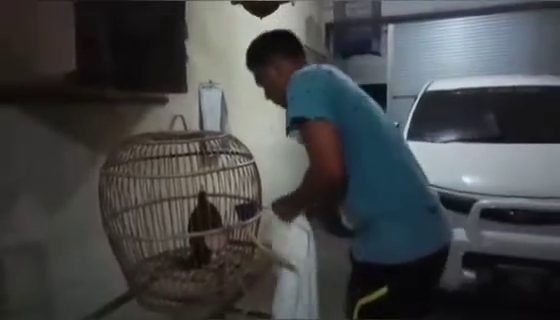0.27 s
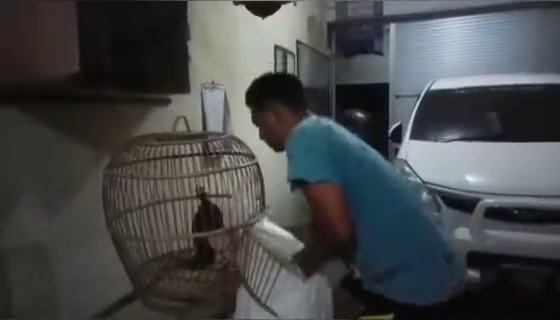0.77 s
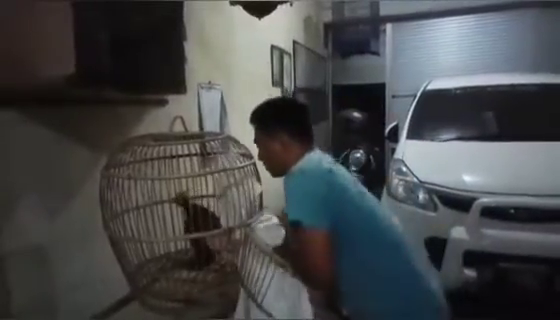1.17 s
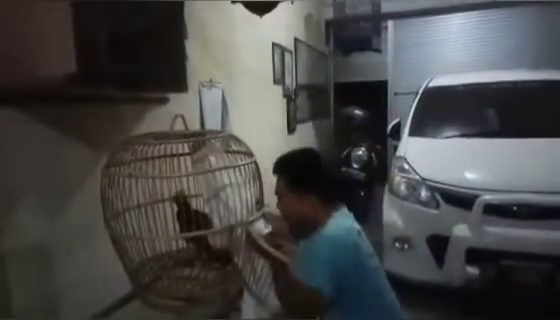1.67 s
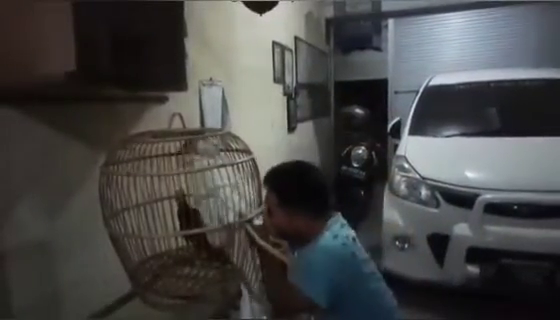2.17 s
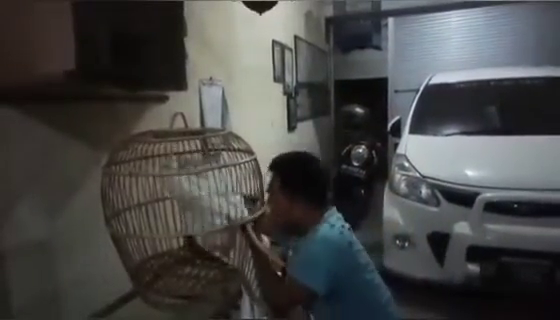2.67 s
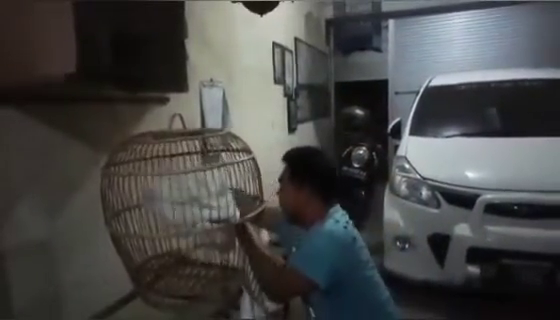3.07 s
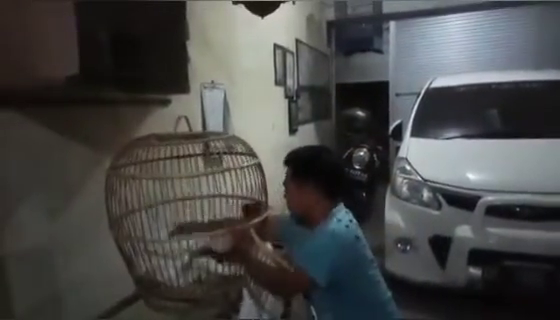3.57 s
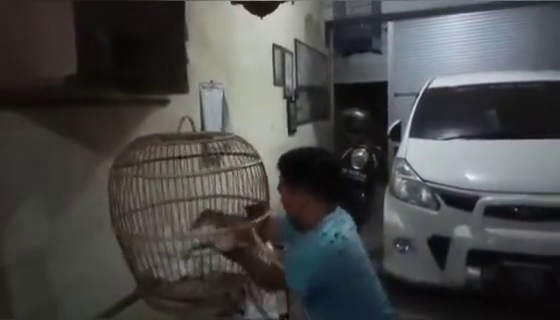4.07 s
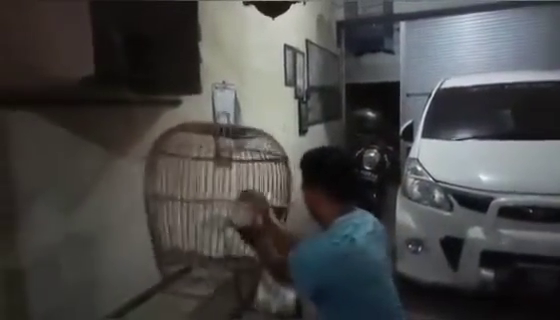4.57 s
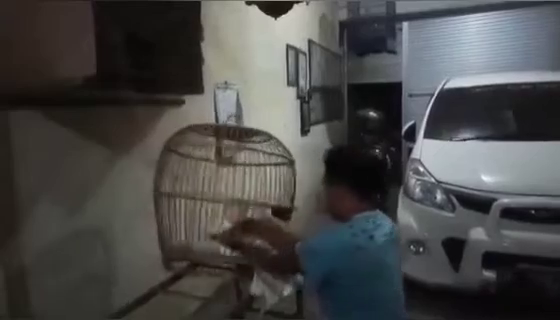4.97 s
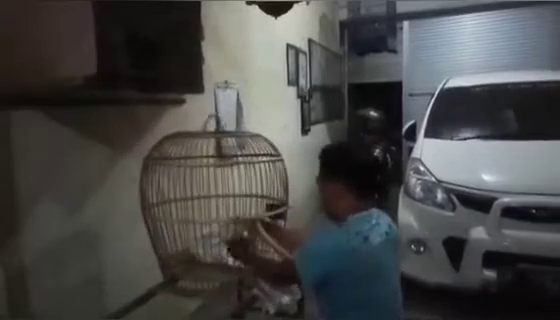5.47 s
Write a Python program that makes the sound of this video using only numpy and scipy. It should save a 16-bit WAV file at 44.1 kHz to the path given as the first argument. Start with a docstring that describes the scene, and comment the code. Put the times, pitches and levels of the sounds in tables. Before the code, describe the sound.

Faint air and low hum lie under isolated cage clicks for three seconds. Then bars and hoops swarm with tiny impacts as the base thumps and drags on a bench. After a lull and another rattle, heavier knocks and a brief fuzzy squeak follow, then one loud crack and fading ticks, with short sparse echoes.

```python
"""In a hard-walled garage at night, a bird is caught with a cloth inside a bamboo cage; the bird is silent.
Struck bars tick, loose bars and hoops chatter in swarms of tiny impacts, and cloth slips over them.
The base knocks and drags on its bench as blows ring its modes; noise whistles as squeaking joints.
Sparse echoes follow, and a dull microphone colours the cage and its echoes.
Faint air noise, a wavering hum and a hiss that swells with the sound lie underneath."""
import sys
import numpy as np
from scipy import signal
from scipy.io import wavfile
from scipy.ndimage import uniform_filter1d

SR = 44100
rng = np.random.default_rng(int(sys.argv[2]) if len(sys.argv) > 2 else 0)


def wav_out(sig):
    """Save sig, one row per channel (or a flat mono array), as 16-bit PCM at SR to the path in sys.argv[1]."""
    wavfile.write(sys.argv[1], SR, np.round(np.clip(np.atleast_2d(sig).T, -1, 1) * 32767).astype(np.int16))


N = 251811  # length in samples

# ringing modes of the base and bench: pitch_hz [Hz], width_hz [Hz], level_db [dB, relative]
BASE_MODES = [(149, 22, 4), (192.4, 51, 1), (284, 7.2, -12.5), (342, 36, 1), (445, 33, 1.5), (490, 52, -13),
              (506, 39, 2), (790, 18, 1.5)]


def gain_of(db):
    """Turns decibels into a gain."""
    return 10 ** (np.asarray(db) / 20)


def evened(x):
    """Scales a sound to an average (rms) level of 1."""
    return x / np.sqrt(np.mean(x ** 2) + 1e-20)


def read(points, hz):
    """Reads a curve over frequency, with straight lines on a log-frequency axis."""
    point_hz, value = np.transpose(points)
    return np.interp(np.log(hz + 1), np.log(point_hz + 1), value)


def along(rows):
    """Reads the columns of a curve over time at every sample."""
    seconds, *columns = np.transpose(rows)
    return [np.interp(np.arange(N) / SR, seconds, column) for column in columns]


def add(mix, start_s, sound):
    """Mixes a sound in at start_s seconds, cut off at the end of the mix."""
    part = mix[round(start_s * SR):][:len(sound)]
    part += sound[:len(part)]


def resonate(x, hz, width_hz):
    """Shifts hz down to zero, smooths, and shifts back: a resonance of gain 1."""
    turn = np.exp(2j * np.pi * np.cumsum(hz * np.ones(len(x))) / SR)
    r = np.exp(-np.pi * width_hz / SR)
    smooth = signal.lfilter([1 - r], [1, -r], x / turn + 1e-18)
    return 2 * (turn * smooth).real


def contacts(per_s, spread_db):
    """Small impacts of either sign at random times, their sizes scattered by spread_db."""
    size = gain_of(spread_db * np.minimum(rng.exponential(1, N), 4))
    happens = rng.random(N) < per_s / SR
    return size * happens * rng.choice([-1., 1.], N)


def grains(lo_hz, hi_hz, t60_s, per_s, spread_db, count=24):
    """Impacts shared out among sticks that each ring at their own pitch."""
    hits = contacts(per_s, spread_db)
    stick = rng.integers(0, count, N)
    t = np.arange(2048) / SR
    fade = gain_of(-60 * t / t60_s)
    total = np.zeros(N)
    for k, hz in enumerate(np.geomspace(lo_hz, hi_hz, count)):
        ring = fade * np.sin(2 * np.pi * hz * t)
        total += signal.oaconvolve(hits * (stick == k), ring)[:N]
    return evened(total)


def wash(spectrum, patchy_db):
    """Noise from random short-time spectra with smooth louder and softer patches."""
    frames, hz = N // 256 + 5, np.fft.rfftfreq(1024, 1 / SR)
    a, b, patches = rng.standard_normal((frames, 513, 3)).T
    patches = uniform_filter1d(patches, 10, 0)  # smooth over frequency
    patches = evened(uniform_filter1d(patches, 12, 1))  # then over time
    z = (a + 1j * b) * gain_of(read(spectrum, hz)[:, None] + patchy_db * patches)
    return evened(signal.istft(z, nperseg=1024, noverlap=768)[1][:N])


def background():
    """Night air is shaped noise; each hum tone wavers in pitch and level together."""
    # colour of the air noise: pitch_hz [Hz], level_db [dB, relative]
    air_colour = [(15, -39), (25, -25.5), (134, -5), (166, -8.5), (194, -6.5), (299, -13.5), (389, -14),
                  (462, -10.5), (575, -23), (614, -21.5), (1500, -24.5), (3070, -23), (4550, -35.5),
                  (5920, -57), (10000, -120)]
    # wavering hum tones: pitch_hz [Hz, centre], level_db [dB, centre]
    hum_tones = [(145.3, -76.5), (199.2, -73), (242.2, -77), (290.7, -75)]
    hum = np.zeros(N)
    for hz, level_db in hum_tones:
        drift = evened(uniform_filter1d(rng.standard_normal(N), 2500))
        phase = 2 * np.pi * np.cumsum(hz + 3 * drift) / SR
        hum += gain_of(level_db + 3.1 * drift) * np.sqrt(2) * np.sin(phase)
    air_db = -65.5  # rms level
    return gain_of(air_db) * wash(air_colour, 1.1) + hum


def garage(x):
    """Hard walls send back sparse echoes of random sign, each band dying at its own speed."""
    # how long the echoes last: pitch_hz [Hz], t60_s [s to fall 60 dB, before the extra drop below]
    wall_decay = [(150, 0.73), (500, 0.46), (1400, 0.76), (3700, 0.31), (9000, 0.4)]
    taps = np.zeros(SR)
    at = np.arange(400, SR - 20, 20)  # the first echo comes after about 9 ms
    taps[at + rng.integers(0, 20, len(at))] = rng.choice([-1., 1.], len(at))
    hz, t, z = signal.stft(taps, SR, nperseg=256)
    z = z * gain_of(-9.0 / (1 + np.exp(-(t - .115) / 0.015)))  # the level drops 9 dB around 0.115 s
    t60_s = np.maximum(read(wall_decay, hz), .05)
    tail = signal.istft(z * gain_of(-60 * t / t60_s[:, None]), SR, nperseg=256)[1]
    return signal.fftconvolve(x, tail / np.linalg.norm(tail))[:N]


def microphone(x):
    """Causal colour: a steep fall above the port resonance and a weak lobe in the treble."""
    # how strongly the microphone picks up each pitch: pitch_hz [Hz], level_db [dB]
    mic_colour = [(30, -34.5), (85, -12.5), (125, -0.5), (3500, 1.5), (3900, -3), (4400, -12),
                  (5300, -28.5), (6400, -38.5), (8700, -29), (10500, -36.5), (12500, -43), (16000, -53)]
    log_gain = np.log(gain_of(read(mic_colour, abs(np.fft.fftfreq(4096, 1 / SR)))))
    # the Hilbert transform finds the phase that lets no sound arrive early
    taps = np.fft.ifft(np.exp(np.conj(signal.hilbert(log_gain)))).real[:2048]
    return signal.oaconvolve(x, taps)[:N]


def squeaks():
    """Fast uneven slips in the wicker joints, made of narrow noise, give a fuzzy whistle."""
    # one curve for each squeak of the joints: start_s [s], pitch_hz [Hz], level_db [dB]
    squeak_curves = [
        [(3.79, 3040, -54), (3.85, 3100, -72), (3.92, 3150, -67)],
        [(3.8, 2160, -66), (3.92, 2130, -65.5), (3.99, 2300, -64), (4.05, 2370, -43)],
        [(4.92, 2930, -33), (4.97, 3100, -59), (5.03, 3600, -60)],
    ]
    out = np.zeros(N)
    for rows in squeak_curves:
        start_s, end_s = rows[0][0], rows[-1][0]
        hz, level_db = along(rows)
        inside = slice(round(start_s * SR), round(end_s * SR))
        whistle = evened(resonate(rng.standard_normal(N)[inside], hz[inside], 70))
        soft_ends = signal.windows.tukey(len(whistle), .3)
        add(out, start_s, gain_of(level_db[inside]) * whistle * soft_ends)
    return out


def shudder():
    """Uneven small bumps drive the modes of the base and the hollow under it."""
    # one curve for each heave that drags the base: start_s [s], level_db [dB, before the two parts add]
    heaves = [
        [(0.13, -80), (0.2, -64.5), (0.3, -75), (0.33, -88)],
        [(2.95, -71.5), (3.1, -53.5), (3.21, -48), (3.35, -50), (3.43, -41.5), (3.54, -54), (3.64, -76),
         (3.75, -54.5)],
        [(4.0, -73), (4.12, -62.5), (4.18, -48.5), (4.23, -57.5), (4.35, -57), (4.43, -65)],
        [(4.44, -67), (4.5, -48.5), (4.6, -49), (4.66, -44), (4.73, -53), (4.82, -54), (4.94, -45),
         (5.055, -55), (5.1, -88)],
    ]
    hollow_hz = 346
    bumps = signal.oaconvolve(contacts(900, 2.0), np.hanning(60), "same")  # rounded: soft contacts
    modes = evened(sum(gain_of(db) * resonate(bumps, hz, width) for hz, width, db in BASE_MODES))
    hollow = evened(resonate(resonate(bumps, hollow_hz, 350), hollow_hz, 350))
    drag = modes + 1.14 * hollow
    out = np.zeros(N)
    for rows in heaves:
        start_s, end_s = rows[0][0], rows[-1][0]
        level_db, = along(rows)
        sound = (gain_of(level_db) * drag)[round(start_s * SR):round(end_s * SR)]
        add(out, start_s, sound * signal.windows.tukey(len(sound), .05))
    return out


def knocks():
    """A soft blow on the bench rings one low mode and the whole base, and thumps the bench legs."""
    # knocks of the base: start_s [s], level_db [dB], pitch_hz [Hz], thump_db [dB, relative to level_db]
    knock_list = [(0.213, -39.5, 266, -21), (0.236, -40, 143, -8), (1.193, -42.5, 246, -23),
                  (3.028, -41, 167, -24), (3.128, -30, 394, -32), (3.15, -33.5, 261, -24),
                  (3.235, -28.5, 513, -34), (3.283, -42, 374, -25), (3.333, -34, 189, -12),
                  (3.371, -24, 489, -28), (3.384, -23, 416, -22), (3.415, -36, 144, -17),
                  (3.441, -46, 316, -26), (4.136, -42, 151, -24), (4.169, -46, 130, -16),
                  (4.491, -29, 358, -39), (4.552, -29, 490, -38), (4.595, -32, 334, -20),
                  (4.625, -39, 465, -20), (4.645, -30, 357, -24), (4.664, -37, 318, 7),
                  (4.68, -38, 197, -22), (4.873, -26, 510, -34), (4.917, -25.5, 334, -25),
                  (4.939, -27, 416, -29), (4.964, -32, 560, -25), (5.008, -32, 380, -25.5),
                  (5.045, -41, 398, -30)]
    base_t60_s, ring_cycles = 0.022, 12.6  # ring time = a base time plus some cycles
    out, t = np.zeros(N), np.arange(8000) / SR
    body = np.zeros(len(t))
    for hz, width_hz, level_db in BASE_MODES:
        body += gain_of(level_db) * np.exp(-np.pi * width_hz * t) * np.sin(2 * np.pi * hz * t)
    body = 1.76 * body / abs(body).max()
    legs = gain_of(-60 * t / 0.13) * np.sin(2 * np.pi * 80 * t)
    soft_start = 1 - np.exp(-t / .0012)
    for start_s, level_db, hz, thump_db in knock_list:
        t60_s = base_t60_s + ring_cycles / hz
        ring = gain_of(-60 * t / t60_s) * (np.sin(2 * np.pi * hz * t) + body)
        add(out, start_s, gain_of(level_db) * (ring + gain_of(thump_db) * legs) * soft_start)
    return out


def chatter():
    """Loose bars and hoops clatter in swarms while the cloth's fibres slip over them."""
    # how hard the cage is shaken: start_s [s], bars_db [dB], hoops_db [dB, relative to bars_db]
    shaking = [(0, -63, -7), (0.6, -65.5, -5), (0.84, -60.5, -5), (1.05, -65, -7), (2.0, -67.5, -3.5),
               (2.43, -67.5, -2.5), (2.97, -75, -10), (3.03, -58, 4.5), (3.14, -49, -5),
               (3.19, -44.5, -5.5), (3.28, -36, -8), (3.31, -45, -3), (3.355, -44.5, -18), (3.6, -56, -8),
               (3.8, -66.5, 2), (4.03, -57, -4.5), (4.12, -50, 0), (4.27, -42, -8), (4.46, -52.5, -1),
               (4.8, -52, -4.5), (4.87, -39.5, -4.5), (4.97, -44, -6), (5.11, -56.5, -5), (5.45, -64, -3.5),
               (5.71, -69, -3.5)]
    # jolts that add a dying burst: start_s [s], bars_db [dB], hoops_db [dB, relative], fade_db [dB per s]
    jolts = [(0.143, -61, -17, 100), (0.213, -56, -2.5, 103), (1.188, -45, -5, 111),
             (1.415, -70.5, 7.5, 44), (2.436, -61, -10, 83), (2.503, -59.5, -7.5, 24), (2.786, -50, -6, 99),
             (3.026, -55.5, 0, 58), (3.36, -47.5, 6.5, 74), (4.129, -47.5, 8, 90), (4.646, -53, 5.5, 100),
             (4.874, -51.5, 11.5, 110), (5.132, -46, -6.5, 105), (5.225, -45, -1.5, 148)]
    cloth_db, loud_bar_hz = 3.5, 3040  # cloth_db is relative to the bars
    bars_db, hoops_db = along(shaking)
    bar_power, hoop_power = gain_of(2 * bars_db), gain_of(2 * (bars_db + hoops_db))
    t = np.arange(SR) / SR
    for start_s, level_db, hoop_db, fade_db in jolts:
        add(bar_power, start_s, gain_of(2 * (level_db - fade_db * t)))
        add(hoop_power, start_s, gain_of(2 * (level_db + hoop_db - fade_db * t)))
    bars = grains(1618, 4440, 0.025, per_s=2000, spread_db=0.0)
    bars = evened(bars + 1.22 * resonate(bars, loud_bar_hz, 1100))  # bars nearest the hand ring most
    hoops = grains(648.0, 1626, 0.0091, per_s=500, spread_db=-1.0)
    cloth = evened(np.diff(contacts(6600, 2.3), prepend=0))
    bars_and_cloth = bars + gain_of(cloth_db) * cloth
    return np.sqrt(bar_power) * bars_and_cloth + np.sqrt(hoop_power) * hoops


def ticks():
    """Each blow is a snap and a short rough contact that ring a bar and the hoop."""
    # blows on the bars: start_s [s], level_db [dB, bar peak], bar_pitch_hz [Hz],
    # hoop_db [dB, relative to the bar], hardness_db [dB, treble relative to the bar], contact_s [s]
    blow_list = [(0.2143, -44, 1650, 9, -10, .0006), (1.09, -53, 3320, -29, 19, .004),
                 (1.1183, -41.5, 3420, -11, 5, 0.0023), (1.1852, -36, 3530, -17, 5, 0.0045),
                 (1.2001, -22.5, 2880, -22, -5, 0.0019), (1.4145, -39, 950, -17, -12, 0.004),
                 (2.4349, -45, 3320, -22, 18, 0.0059), (2.5022, -37.5, 3460, -9.5, 21, 0.0045),
                 (2.6252, -43, 3080, -29, -9, 0.0054), (2.7878, -28, 1820, -17, -5, 0.0069),
                 (3.026, -42.5, 3380, -4, -8, 0.013), (3.084, -43.5, 3100, -25, 14, 0.0051),
                 (3.146, -30.5, 2870, -28, 24.5, 0.0037), (3.1817, -24, 2210, -30, -12, 0.0045),
                 (3.2141, -20.5, 2340, -31, -15, 0.0051), (3.2343, -25, 2800, -13, -8, .009),
                 (3.259, -32, 2870, -20, -12, 0.012), (3.2794, -30.5, 3130, -33, 5, 0.0092),
                 (3.2924, -42, 3050, -15, -2, 0.0017), (3.3327, -43, 2140, 7, 2, 0.00093),
                 (3.3597, -20, 2190, -8.5, -33, 0.0045), (3.361, -35, 3250, -15, -24, 0.0063),
                 (3.5239, -33.5, 2980, -4, 8, 0.0074), (3.573, -29.5, 2740, -7.5, -9, 0.0052),
                 (3.9397, -40, 3050, -24, -1, 0.0019), (4.1289, -28, 2940, -4, -7, 0.0057),
                 (4.156, -32.5, 2780, -3, -7, 0.0053), (4.267, -30, 3000, -1.5, -14, 0.0093),
                 (4.5526, -43.5, 2920, 0, 2, .0014), (4.6454, -38, 1500, 1, -1, 0.0059),
                 (4.671, -33, 3140, 1.5, 1, 0.0063), (4.8752, -30, 2870, -0.5, -4, 0.00186),
                 (4.8833, -27.5, 3930, -16, -7, 0.0043), (4.9186, -30, 3050, 0.5, -16, 0.0018),
                 (4.9424, -24, 3260, -20, -4, 0.0052), (5.127, -16.5, 3120, -14, -22, .0013),
                 (5.2232, -37.5, 1770, 5, 0, 0.0013), (5.2594, -29, 2500, -24, 8, 0.001),
                 (5.4969, -43, 3480, -11, 11, 0.0019), (5.668, -59.5, 3200, 8, 0, 0.0033)]
    snap_db, snap_db_per_s = 15, -7000  # the shorter the contact, the cleaner the snap
    echo_db, echo_db_per_s, echo_most_db = -6.5, 3000, -1  # longer clashes send more into the room
    hoop_hz = 1030
    out, echo, t = np.zeros(N), np.zeros(N), np.arange(3000) / SR
    for start_s, level_db, bar_hz, hoop_db, hard_db, contact_s in blow_list:
        snap = gain_of(snap_db + snap_db_per_s * contact_s) * (t == 0)
        swell = 1 - np.exp(-1.2 * t / contact_s)
        rough = rng.standard_normal(len(t)) * np.exp(-t / max(contact_s, 3e-4)) * swell
        blow = rough + snap
        bar = np.diff(resonate(blow, bar_hz, 500), prepend=0)
        hoop = resonate(resonate(blow, hoop_hz, 910), hoop_hz, 910)
        crack = resonate(np.diff(blow, prepend=0), 7300, 6700)  # a hard contact adds treble
        sound = bar / abs(bar).max() + gain_of(hoop_db) * hoop / abs(hoop).max()
        sound = gain_of(level_db) * (sound + gain_of(hard_db) * crack / abs(crack).max())
        add(out, start_s, sound)
        send_db = min(echo_db + echo_db_per_s * contact_s, echo_most_db)
        add(echo, start_s, gain_of(send_db) * sound)
    return out, echo


def scene():
    """The microphone colours the cage and its echoes; the background is added after it."""
    tick, tick_echo = ticks()
    knock = knocks()
    swarms = chatter() + shudder() + squeaks()
    echoes = garage(tick_echo + gain_of(-8.5) * knock + gain_of(-13.0) * swarms)
    cage = microphone(tick + knock + swarms + echoes)
    return (cage + background())[None]


def record(dry):
    """Adds hiss that swells with the sound, then cuts off the highest treble."""
    # colour of the hiss: pitch_hz [Hz], level_db [dB, relative]
    hiss_colour = [(60, -34), (3000, -5), (6000, 1.5), (9000, 1), (12000, 0.5), (15000, 1.5), (18000, -9)]
    hiss_db, swell_db, edge_hz = -82.5, -44.5, 15520  # hiss floor, hiss relative to sound, treble limit
    level = np.sqrt(abs(uniform_filter1d(dry ** 2, 2000)))
    hiss = wash(hiss_colour, 0.28) * np.hypot(gain_of(hiss_db), gain_of(swell_db) * level)
    treble_cut = signal.firwin(511, edge_hz, window=("kaiser", 9), fs=SR)
    return signal.oaconvolve(dry + hiss, treble_cut[None], "same")


dry = scene()
out = record(dry)
wav_out(out)
```